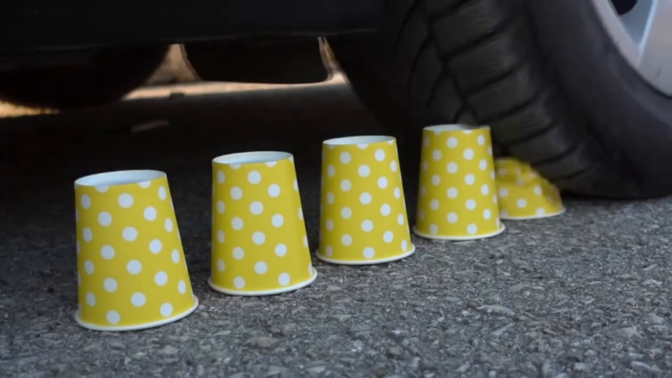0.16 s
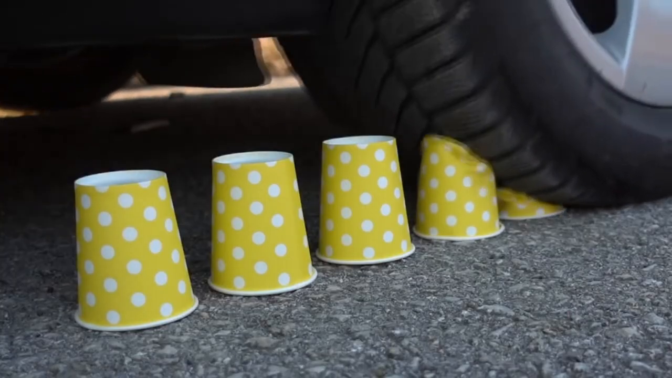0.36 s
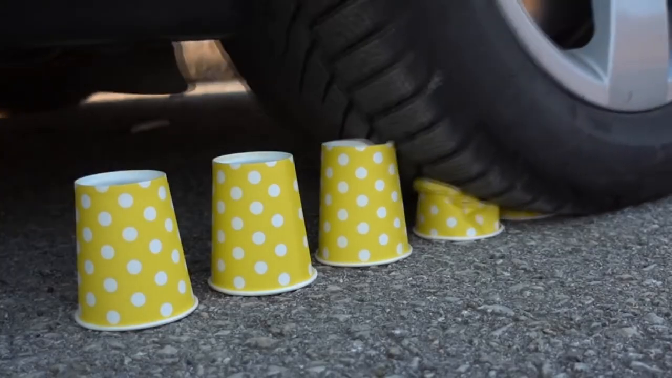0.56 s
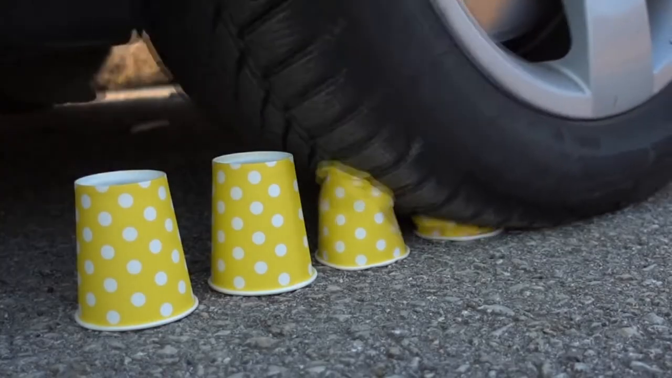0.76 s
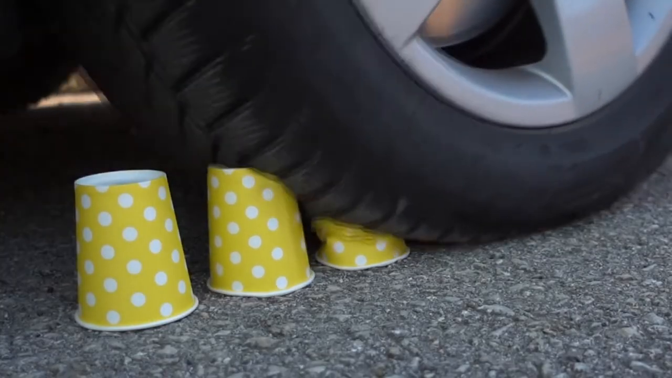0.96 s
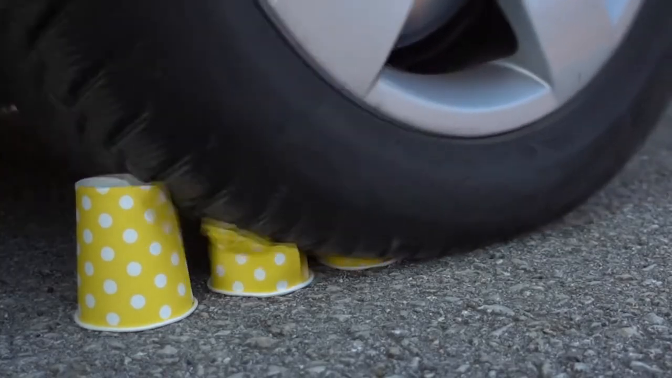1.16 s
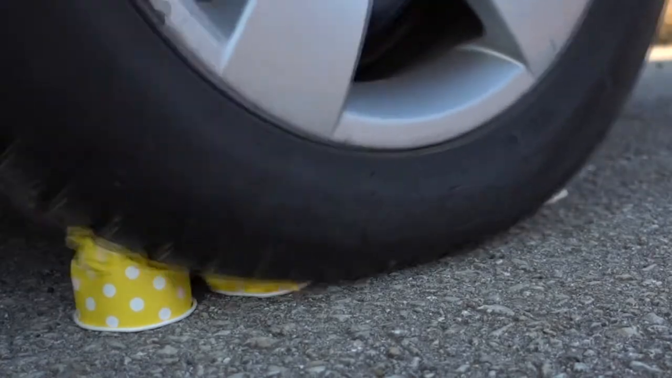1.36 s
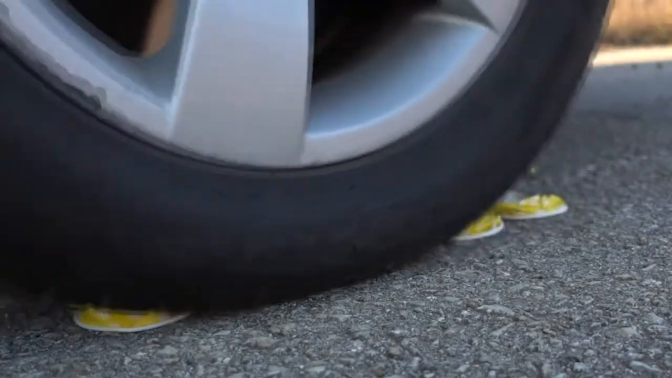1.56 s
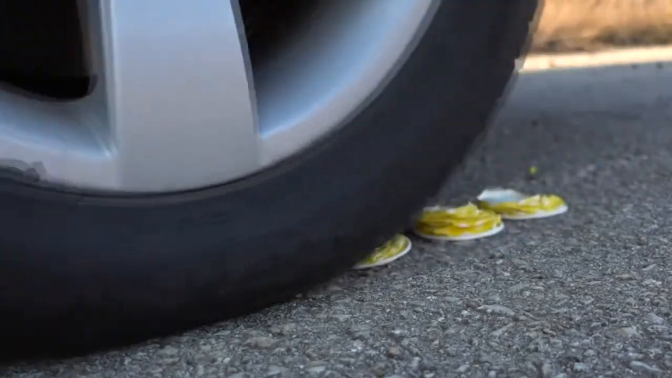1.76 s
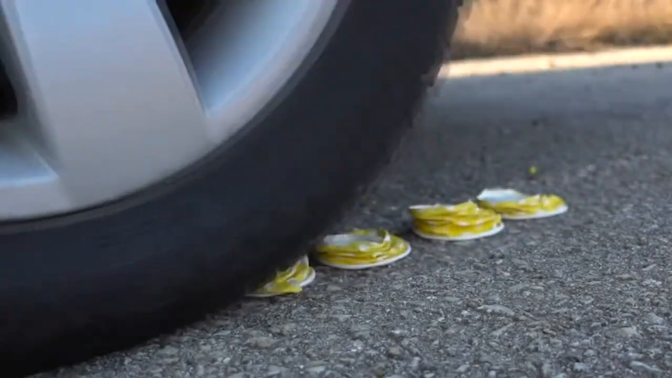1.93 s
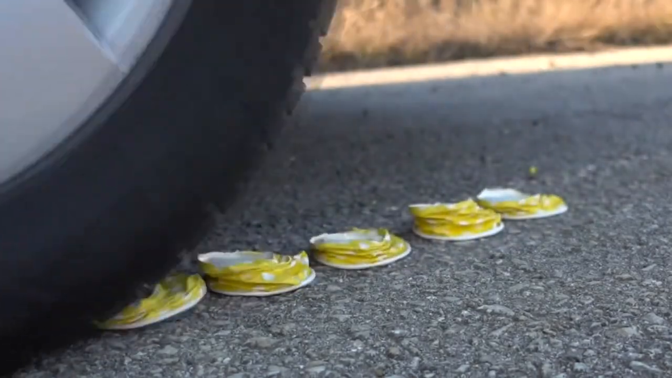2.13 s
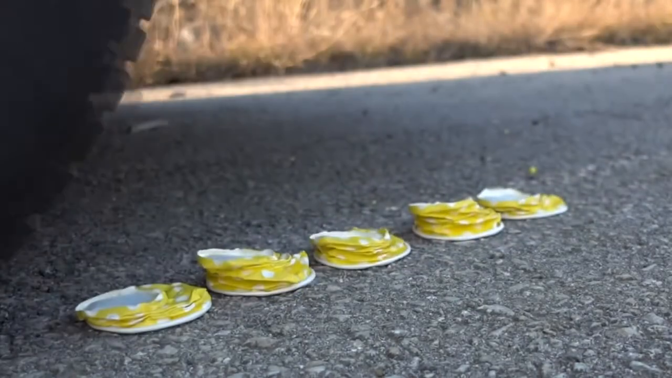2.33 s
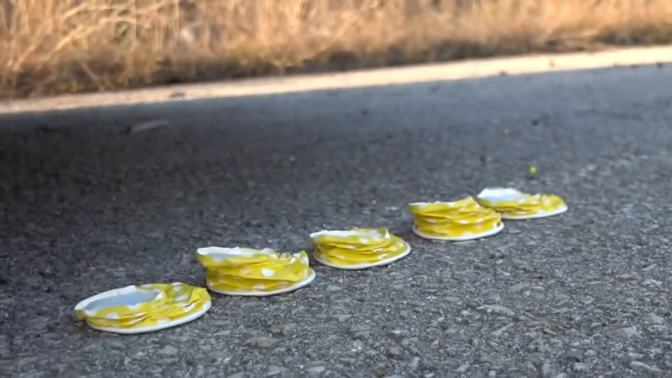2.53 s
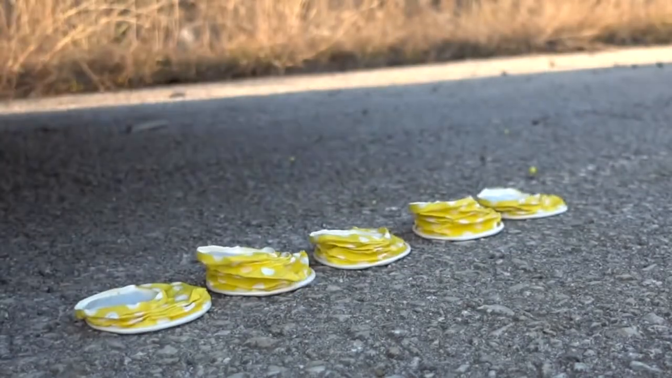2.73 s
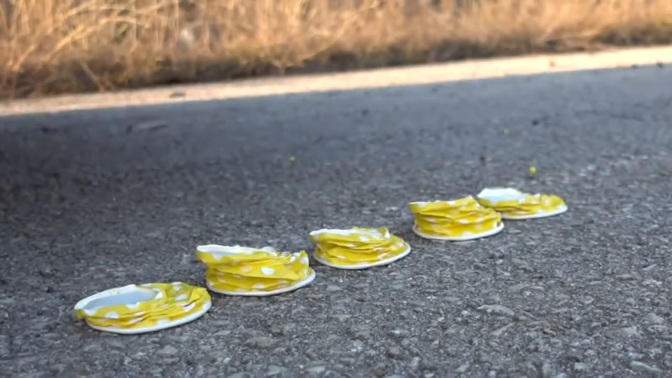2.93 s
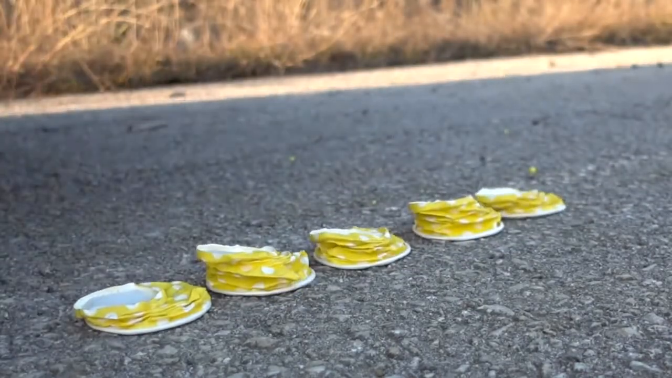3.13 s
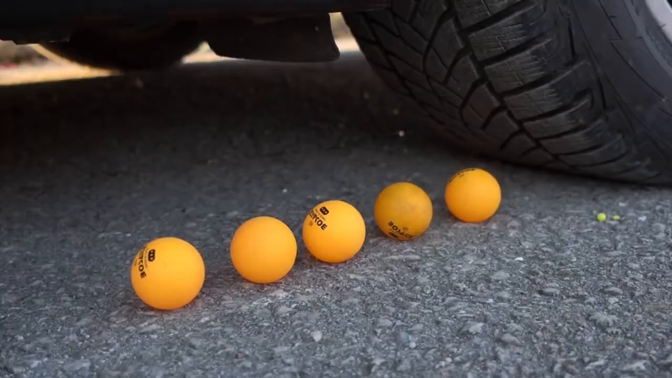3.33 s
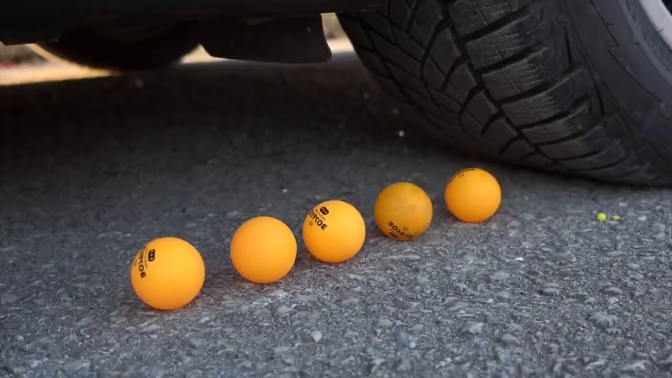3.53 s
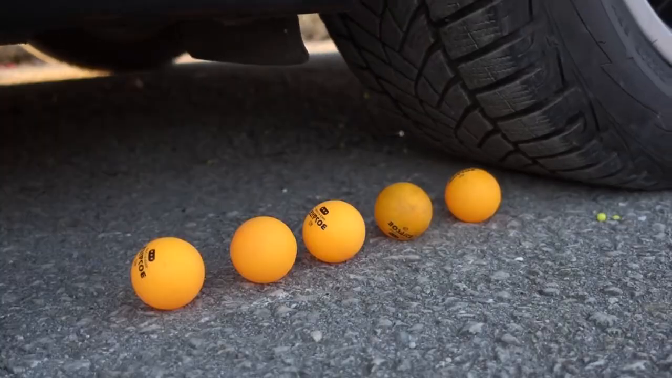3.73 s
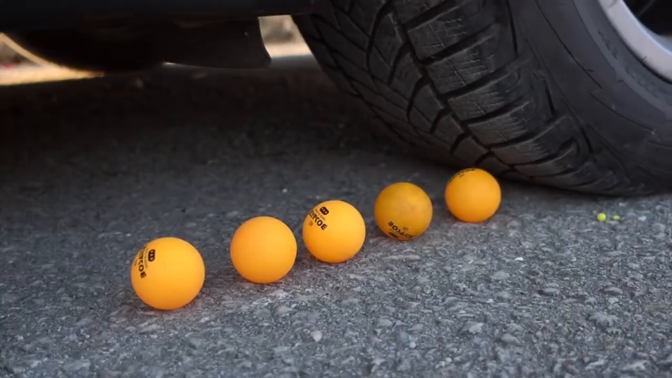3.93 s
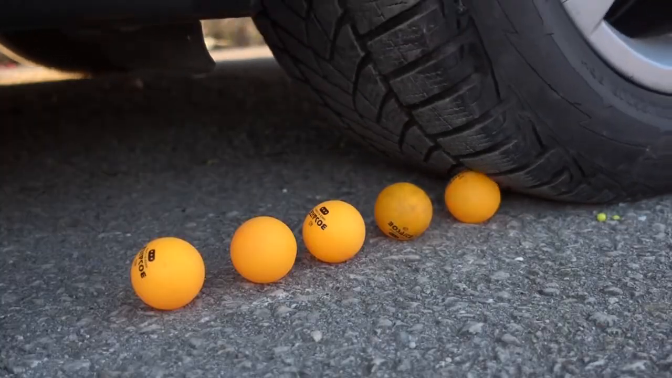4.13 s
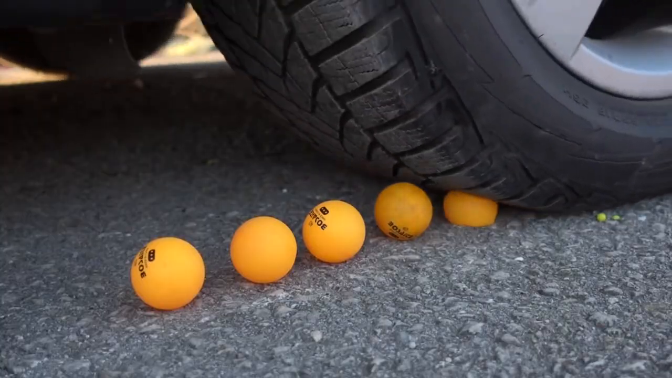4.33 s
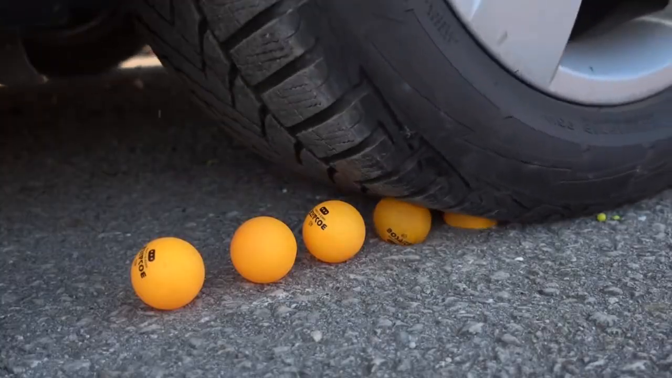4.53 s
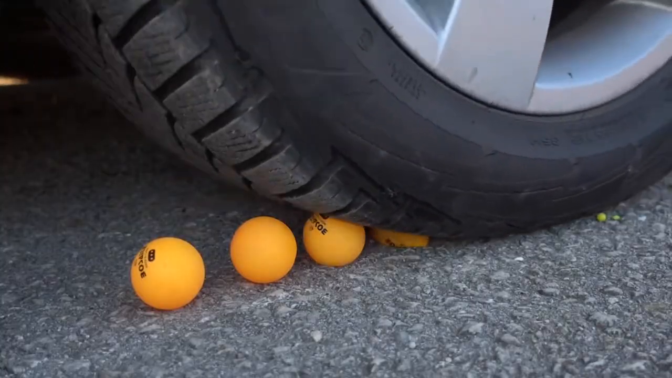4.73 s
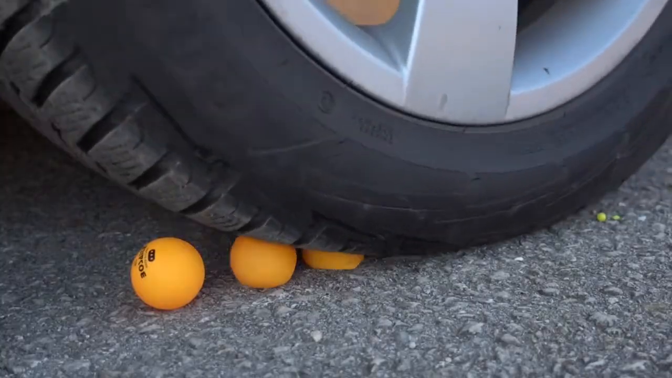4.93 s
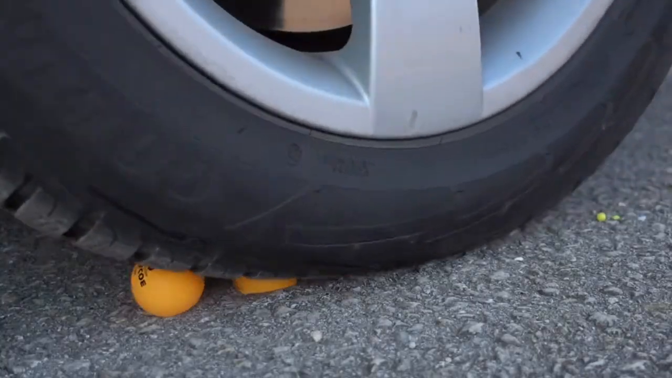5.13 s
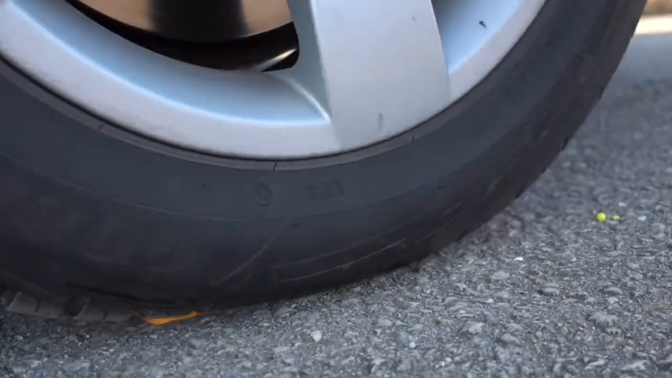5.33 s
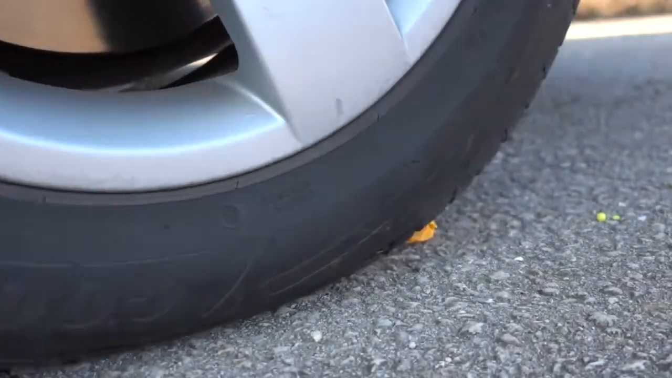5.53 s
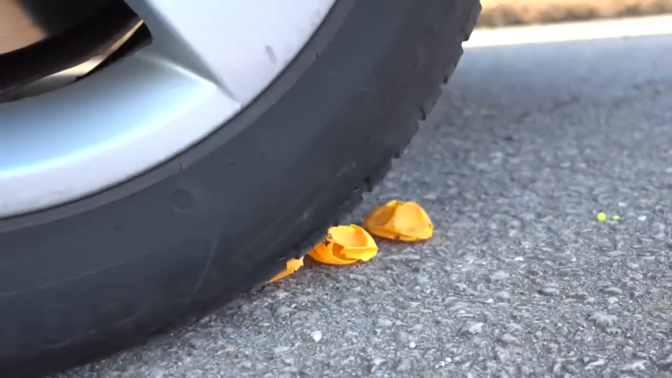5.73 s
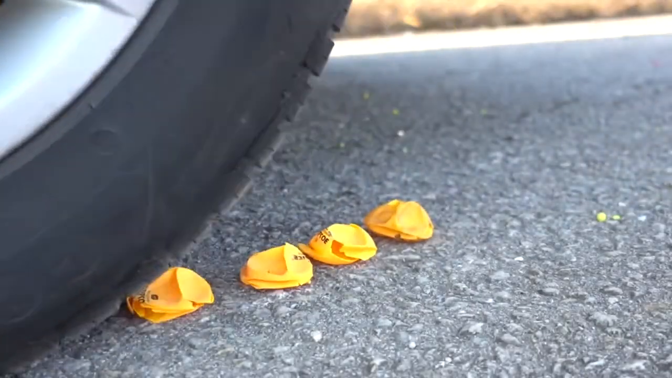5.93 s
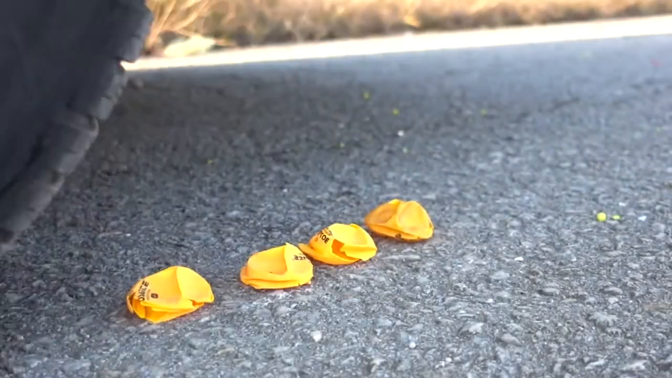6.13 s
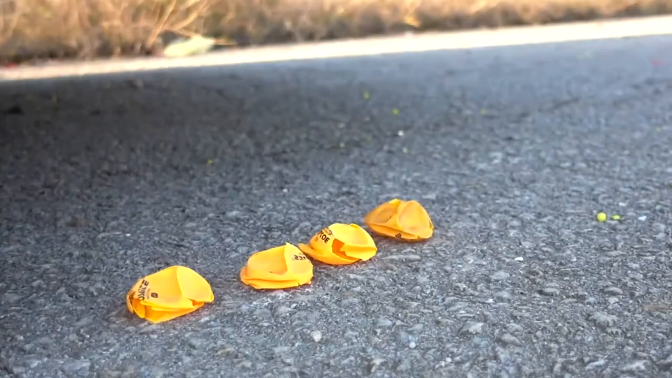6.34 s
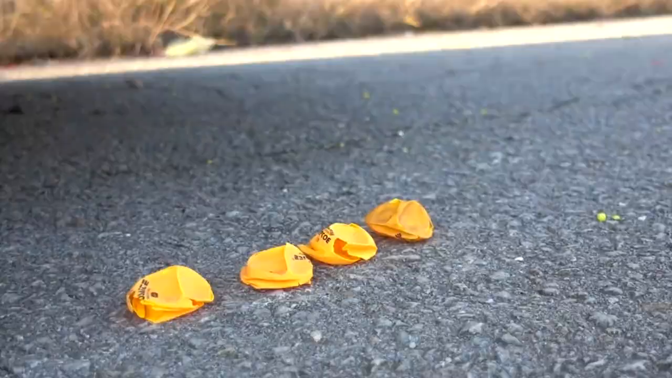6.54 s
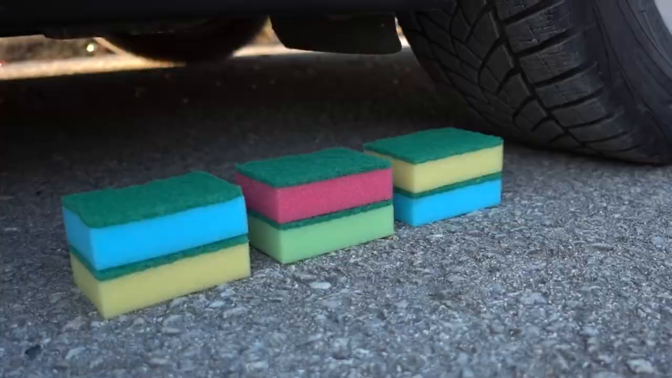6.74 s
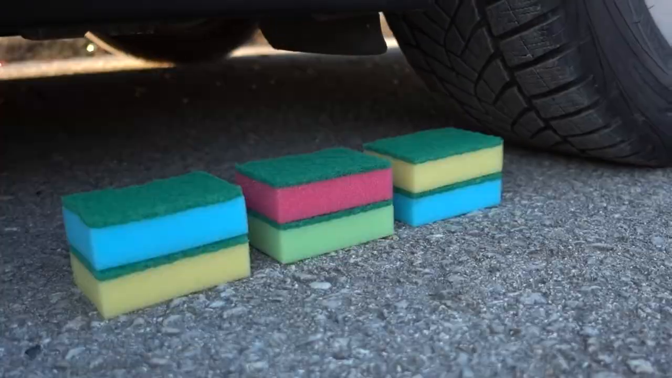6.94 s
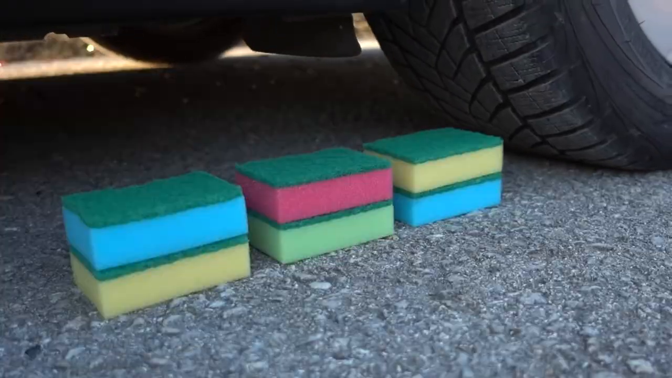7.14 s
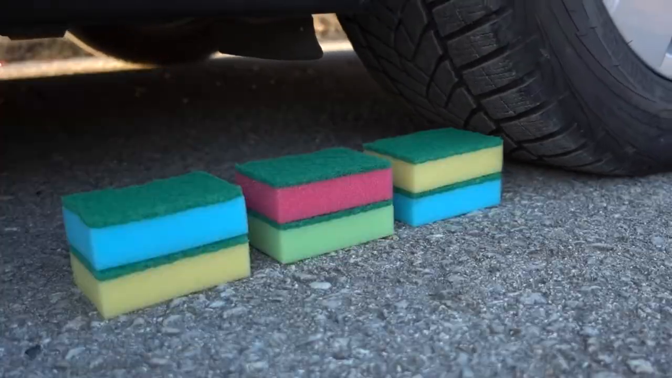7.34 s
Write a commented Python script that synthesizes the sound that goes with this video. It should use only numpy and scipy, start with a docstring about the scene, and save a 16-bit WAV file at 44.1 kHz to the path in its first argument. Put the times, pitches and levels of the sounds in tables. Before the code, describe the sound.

A car tyre creeps over asphalt, crushing paper cups with loud crackling and crumpling, then cracking a row of hollow plastic balls.

```python
"""A car tyre creeps over coarse asphalt close by, with a hiss and a low rumble that come and go. First it
crushes a row of paper cups: creases snap, walls pop and the car's underside echoes briefly. At 1.5 s it drops
off the cups and the air inside it hums; flat cups crinkle back and grit clicks. Around 3 s come scuffs, two
hollow scrapes and a soft low puff of wind. From 4.3 s a row of hollow plastic balls cracks; the tyre drops and
hums again, the shells spring back, and a few low wind puffs and clicks end the scene."""
import sys
import numpy as np
from scipy import signal
from scipy.fft import rfft, irfft, next_fast_len
from scipy.io import wavfile
from scipy.ndimage import map_coordinates

SR = 44100
rng = np.random.default_rng(int(sys.argv[2]) if len(sys.argv) > 2 else 0)


def wav_record(signal):
    """Record a signal, one row per channel, as 16-bit PCM in the file named by sys.argv[1]."""
    frames = np.transpose(np.atleast_2d(signal))
    bounded = np.clip(frames, -1, 1)
    # unit amplitude maps onto the largest positive 16-bit level
    quanta = np.round(bounded * 32767).astype(np.int16)
    wavfile.write(sys.argv[1], SR, quanta)


N = 330309

# the car creeping along: (time [s], rumble level [dB], rolling hiss level [dB])
ROAD_LEVELS = [(0, -41, -38.5), (1.4, -37, -31), (1.75, -54, -48), (3.2, -51.5, -43), (3.4, -40.5, -49),
               (3.52, -35, -59.5), (3.75, -61, -69), (4.2, -60.5, -63.5), (4.6, -42, -52.5),
               (5.4, -40, -58), (5.9, -57.5, -56), (6.4, -42.5, -52.5), (6.79, -41.5, -48),
               (6.81, -58.5, -67.5)]
# tone of the low rumble, the distant air and the rolling hiss: (frequency [Hz], level [dB])
RUMBLE_TONE = [(20, -24.5), (50, -0.5), (110, 6), (250, 1), (700, -48.5)]
DISTANT_TONE = [(700, -8.5), (1200, -39.5), (2130, -17.5), (3200, -30.5)]
ROLLING_TONE = [(200, 3), (600, 1.5), (1640, 2.5), (3000, -5.5), (5500, -16.5), (11000, -15)]
# where the wheel arch, loaded tyre and a dragged thing ring: (pitch [Hz], width [Hz], level [dB])
ARCH_RINGS = [(599, 41, 8.5), (3910, 360, 0.5)]
TYRE_RINGS = [(258, 35, 0)]
DRAGGED_RINGS = [(446, 70, 0), (1900, 90, -5)]
# cups and balls going under the tread, the last ball in two steps:
# (start [s], length [s], fine crackle level [dB], hollow crumple level [dB])
CUP_SQUEEZES = [(0, 0.029, -14, -9), (.25, 0.29, -16.5, -10.5), (.61, 0.27, -14, -10),
                (.92, 0.27, -11.5, -13.5), (1.21, 0.35, -15, -10)]
BALL_SQUEEZES = [(4.345, 0.11, -34, -26.5), (4.54, 0.08, -25, -24.5), (4.686, 0.062, -22.5, -21.5),
                 (4.99, 0.22, -26.5, -30), (5.27, 0.14, -18.5, -25), (5.468, 0.041, -20, -20.5)]
# paper creases snapping: (time [s], level [dB])
CREASES = [(0.095, -11.5), (0.2525, -9.5), (0.2801, -12), (0.3016, -6), (0.3248, -8.5), (0.328, -12.5),
           (0.344, -1), (0.3733, -9), (0.3965, -6), (0.407, -6), (0.416, -12), (0.441, -10.5), (0.4544, -4),
           (0.4675, -11.5), (0.525, -11), (0.537, -5.5), (0.571, -3.5), (0.611, -10), (0.6345, -14.5),
           (0.665, -5), (0.6806, -12), (0.7026, -8.5), (0.7193, -2), (0.756, -8), (0.778, -7),
           (0.8465, -11.5), (0.8591, -6.5), (0.973, -6), (1.028, -12.5), (1.0687, -8.5), (1.1416, -4.5),
           (1.172, -5.5), (1.255, -4), (1.2915, -13), (1.3287, -6), (1.354, -8.5), (1.383, -5.5),
           (1.4154, -7), (1.4878, -20.5), (1.523, -15.5), (1.564, -10.5)]
# echo under the car: (frequency [Hz], time to fade by 60 dB [s])
ECHO_TIMES = [(300, 0.06), (10000, 0.12)]
# walls of cups and balls buckling inwards: (time [s], level [dB], pitch [Hz])
WALL_POPS = [(0.1079, -10, 860), (0.1476, -7, 1420), (0.2282, -7.5, 634), (0.4946, -12.5, 638),
             (0.613, -12, 738), (0.6688, -10.5, 499), (0.875, -8, 808), (0.924, -10.5, 626),
             (0.9806, -8.5, 629), (1.072, -7.5, 1400), (1.187, -11.5, 1390), (1.2114, -7.5, 660),
             (1.2265, -16, 799), (1.27, -12, 760), (1.3111, -12, 1270), (1.375, -10, 685),
             (1.4424, -12.5, 830), (4.6899, -14, 986), (4.7298, -12.5, 794), (5.294, -17.5, 726),
             (5.3737, -13.5, 820), (5.4723, -11.5, 726)]
# the tyre dropping off something it has flattened: (time [s], level [dB])
TYRE_DROPS = [(1.5, -39), (5.495, -37)]
# flattened rows springing back: (start [s], length [s], level [dB], pitch [Hz])
CRINKLES = [(1.782, .55, -47.5, 2340), (5.566, 0.47, -42.5, 4230)]
# grit clicking, small hollow scuffs and plastic cracking: (time [s], level [dB], pitch [Hz])
GRIT_CLICKS = [(1.7963, -15, 2410), (1.849, -20.5, 2980), (1.8855, -20.5, 1330), (1.9672, -22.5, 4040),
               (2.0204, -21, 3330), (2.1174, -20.5, 4900), (2.1519, -20, 3300), (2.173, -20.5, 4550),
               (2.186, -22, 2000), (2.2497, -30.5, 2140), (2.289, -23, 1500), (2.3159, -9.5, 1680),
               (3.0614, -9.5, 1290), (3.167, -14, 1600), (6.5013, -8.5, 3050), (6.53, -16.5, 800),
               (7.084, -34.5, 1320), (7.2866, -33.5, 3200)]
GROUND_SCUFFS = [(2.707, -32, 296), (3.69, -36.5, 500)]
SHELL_CRACKS = [(4.2573, -17.5, 10100), (4.292, -8, 4990), (4.349, -6, 8550), (4.368, -7.5, 1957),
                (4.414, -9, 1830), (4.4524, -11.5, 8100), (4.5385, -7, 5450), (4.6058, -5.5, 8600),
                (4.6622, -5, 8090), (4.679, -7.5, 5240), (4.7227, -4, 6870), (4.7457, -13, 6000),
                (4.771, -8, 5030), (4.784, -10.5, 6590), (4.799, 0, 8920), (4.8257, -9, 7540),
                (4.8723, -8.5, 7800), (4.8896, -5.5, 1846), (4.9369, -5.5, 4790), (4.969, -2, 4480),
                (5.0002, -2.5, 3400), (5.0186, -3.5, 2200), (5.0314, -7.5, 7000), (5.0418, -3.5, 6360),
                (5.0521, -2.5, 2994), (5.1107, -4.5, 4970), (5.1297, -2.5, 6000), (5.1705, -9.5, 6210),
                (5.2017, -6, 6330), (5.266, -6.5, 4400), (5.29, -4, 5160), (5.325, -13, 2490),
                (5.3696, -15, 4170), (5.3948, -6.5, 3580), (5.4123, -9, 5250), (5.451, -3, 8230),
                (5.4703, -9.5, 4630), (5.5416, -8, 3840), (5.6128, -1.5, 6830), (5.6226, -5, 4370),
                (5.655, -5.5, 4540), (5.684, -11, 4430), (5.728, -7, 5140), (5.75, -4.5, 4400),
                (5.7766, -3.5, 3400), (5.796, -15, 3820), (5.8416, -5, 5700), (5.85, -10, 5870),
                (5.892, -4.5, 6700), (5.9726, -9.5, 3254), (6.0664, -11, 2960)]
# something hollow dragged over the asphalt: (start [s], length [s], level [dB])
DRAGS = [(3.275, .04, -37), (3.335, .04, -32)]
# soft low puffs of wind: (middle time [s], level [dB], pitch [Hz])
WIND_PUFFS = [(3.446, -23, 136), (4.577, -22.5, 199), (5.13, -29, 60.7), (5.287, -23, 166), (6.057, -28, 82.5),
              (6.108, -31, 143), (6.429, -22, 173), (6.633, -23, 89), (6.705, -27.5, 70), (6.785, -32.5, 84.6)]
# where the wheel is heard: (time [s], left level minus right level [dB])
WHEEL_SIDE = [(0, -2.5), (2.6, 4), (4.3, -2.5), (6.6, 6)]
# how alike left and right are: (frequency [Hz], likeness [0 to 1])
LIKENESS = [(1200, .94), (2800, .78), (9000, .33)]
# the microphone's treble falling away: (frequency [Hz], level [dB])
TREBLE_CUT = [(10900, 1), (11300, -13.5), (12300, -34.5), (16000, -63.5)]


def amp(db):
    """Turn decibels into a number to multiply a sound by."""
    return 10 ** (np.asarray(db) / 20)


def unit(x):
    """Scale a sound to an average strength (rms) of 1."""
    return x / np.sqrt(np.mean(x ** 2) + 1e-20)


def along(points, hz):
    """Read between a table's (frequency, value) rows, with octaves evenly spaced."""
    f, values = np.transpose(points)
    return np.interp(np.log(hz + 1), np.log(f + 1), values)


def curves(rows):
    """Join timed rows with straight lines, one curve for each column after the time."""
    times, *columns = np.transpose(rows)
    return [np.interp(np.arange(N) / SR, times, column) for column in columns]


def wobble(rate):
    """A smooth curve through `rate` random values a second."""
    return map_coordinates(rng.standard_normal(int(N * rate / SR) + 4), [np.arange(N) * rate / SR])


def filtered(x, response):
    """Multiply each frequency in a sound by response(frequency)."""
    size = next_fast_len(N + SR)
    return irfft(rfft(x, size) * response(np.fft.rfftfreq(size, 1 / SR)), size)[..., :N]


def resonant(x, rings, rest_db):
    """Make a sound ring at some pitches, let the rest through at rest_db, and scale to strength 1."""
    def response(f):
        peaks = sum(amp(db) * 1j * f * width / (hz * hz - f * f + 1j * f * width)
                    for hz, width, db in rings)
        return amp(rest_db) + peaks
    return unit(filtered(x, response))


def stereo(pair, response=np.ones_like):
    """Mix two unrelated sounds into left and right, alike in the bass and less so in the treble."""
    def blend(hz):
        angle = np.arccos(np.clip(along(LIKENESS, hz), -1, 1)) / 2
        return response(hz) * [np.cos(angle), np.sin(angle)]
    mid, side = filtered(pair, blend)
    return np.array([mid + side, mid - side])


def rush(tone):
    """Steady stereo noise shaped by a tone table."""
    return unit(stereo(rng.standard_normal((2, N)), lambda hz: amp(along(tone, hz))))


def place(times, waves):
    """Add each short wave into one track at its start time."""
    at = np.round(times * SR).astype(int)[:, None] + np.arange(waves.shape[1])
    return np.bincount(at.ravel(), waves.ravel(), N)[:N]


def pings(times, db, hz, spread, cycles, notes, size):
    """Each ping is a few notes scattered round a pitch, fading by 60 dB in `cycles` vibrations."""
    draw = rng.standard_normal((len(times), notes, 2))
    pitches = np.clip(hz[:, None] * np.exp(spread * draw[..., 0]), 40, SR / 2.5)[..., None]
    channels = []
    for side in (1, -1):
        delay_s = 2e-5 * (2 - side * draw[..., 1:])  # left and right arrive slightly apart
        turns = pitches * np.clip(np.arange(size) / SR - delay_s, 0, None)
        waves = (np.sin(2 * np.pi * turns) * amp(-60 * turns / cycles) * (1 - np.exp(-3 * turns))).sum(1)
        waves *= (amp(db) / np.abs(waves).max(1))[:, None]
        channels.append(place(times, waves))
    return np.array(channels)


def crackle(span, level_db, hz, spread, cycles, uneven_db, count, size):
    """Tiny pings of very unequal strength, at random times within the span."""
    draw, length = rng.random((count, 2)), span[1] - span[0]
    times = span[0] + draw[:, 0] * length
    ping_db = -uneven_db * np.log(draw[:, 1] + .02)
    ticks = pings(times, ping_db, np.full(count, hz), spread, cycles, notes=2, size=size)
    return amp(level_db) * unit(ticks) * np.sqrt(length * SR / N)


def snaps(times, db, hz, octaves, floor_db, rise_s, fade_s, size=2048):
    """Bursts of noise round a pitch, fading by 60 dB in about fade_s; a faint rattle trails each."""
    t, f = np.arange(size) / SR, np.fft.rfftfreq(size, 1 / SR) + 1
    hump = np.exp(-.5 * (np.log2(f / hz[:, None]) / octaves) ** 2)
    white = rfft(rng.standard_normal((len(times), 2, size)))
    burst = irfft(white * (hump + amp(floor_db) * (f > 300))[:, None], size)
    fades = fade_s * np.exp(.35 * rng.standard_normal((len(times), 1, 1)))
    burst *= amp(-60 * np.clip(t - rise_s, 0, None) / fades)
    rattle = irfft(white * hump[:, None] ** 2, size) * amp(-27 - 60 * t / 0.27)
    waves = np.clip(t / rise_s, 0, 1) ** 2 * (burst + rattle)
    waves *= (amp(db) / np.abs(waves[:, 0]).max(1))[:, None, None]
    return stereo(np.array([place(times - rise_s, waves[:, k]) for k in (0, 1)]))


def squeeze(rows, fades_db_per_s, rise_db_per_s=2897.5):
    """Levels in dB that rise fast, hold while a thing is pressed, then fade; the loudest thing counts."""
    starts, lengths, *levels = np.transpose(rows)[..., None]
    t = np.arange(N) / SR - starts
    rise_db = rise_db_per_s * np.clip(t, None, 0)
    since_end = np.clip(t - lengths, 0, None)
    return [(db + rise_db - fade * since_end).max(0) for db, fade in zip(levels, fades_db_per_s)]


def settling(rows, fade_s, rest_db):
    """A level in dB that jumps at every break and dies away as the torn material settles."""
    times, db = np.transpose(rows)[:2]
    kicks = np.bincount(np.round(times * SR).astype(int), amp(db) ** 2, N)
    power = signal.lfilter([1], [1, -amp(-120 / (fade_s * SR))], kicks)
    return 10 * np.log10(power + amp(rest_db) ** 2)


def rumble_and_air():
    """The creeping car's lumpy low rumble, over a steady hush of distant air."""
    rumble = unit(amp(3.4 * wobble(24)) * rush(RUMBLE_TONE))
    return amp(curves(ROAD_LEVELS)[0]) * rumble + amp(-60) * rush(DISTANT_TONE)


def rolling():
    """Rubber rolls on rough asphalt with a gritty, fluttering hiss that rings in the wheel arch."""
    flutter = amp(2.6 * wobble(180))
    hiss = resonant(rush(ROLLING_TONE), ARCH_RINGS, rest_db=3.5)
    return amp(curves(ROAD_LEVELS)[1]) * unit(flutter * hiss)


def cups():
    """Creases snap, each at its own pitch; the card then tears and crumples dully."""
    fine_db, hollow_db = squeeze(CUP_SQUEEZES, fades_db_per_s=(170, 123))
    times, db = np.transpose(CREASES)
    pitches = 2500 * np.exp(.35 * rng.standard_normal(len(times)))
    creases = snaps(times, db, pitches, octaves=0.73, floor_db=-9.5, rise_s=0.00087, fade_s=0.0082)
    fine_db += settling(CREASES, fade_s=0.08, rest_db=-17.5)
    hollow_db += settling(WALL_POPS, fade_s=0.16, rest_db=-20)
    span_s = (0, 1.75)
    fine = crackle(span_s, fine_db, hz=3305, spread=.7, cycles=6.7, uneven_db=8, count=2300, size=160)
    hollow = crackle(span_s, hollow_db, hz=1000, spread=.42, cycles=8, uneven_db=4.5, count=650, size=600)
    return creases + fine + hollow


def underside(crush):
    """Sound bounces briefly between the car's floor and the road; the treble lasts longest."""
    hz, t, noise = signal.stft(rng.standard_normal((2, SR // 4)), SR, nperseg=128)
    fade = amp(-60 * t / along(ECHO_TIMES, hz)[:, None])
    tail = signal.istft(noise * fade, SR, nperseg=128)[1]
    echo = signal.fftconvolve(crush.mean(0)[None], tail / np.linalg.norm(tail[0]), axes=1)
    return stereo(echo[:, :N])


def tyre(crush, hum_hz=226, fade_s=2.1):
    """The loaded tyre rings dully with all it crushes; after each drop the air inside it hums on."""
    body = amp(-41) * resonant(crush.mean(0), TYRE_RINGS, rest_db=-72)
    times, db = np.transpose(TYRE_DROPS)
    drops = np.bincount(np.round(times * SR).astype(int), amp(db), N)
    t = np.arange(2 * SR) / SR
    hum = amp(-60 * t / fade_s) * np.sin(2 * np.pi * hum_hz * t)
    return body + signal.fftconvolve(drops, hum)[:N]


def wall_pops():
    """A wall flips inwards and the air inside rings for a moment."""
    times, db, hz = np.transpose(WALL_POPS)
    return pings(times - .002, db, hz, spread=0.1, cycles=14, notes=3, size=1500)


def spring_back():
    """Crushed walls unfold in a thin, spiky crinkle as the tread peels off them."""
    return sum(crackle((start, start + length), db, hz,
                       spread=.4, cycles=14, uneven_db=6, count=400, size=200)
               for start, length, db, hz in CRINKLES)


def grit():
    """Single stones and shards click as they slip free under the tread."""
    return snaps(*np.transpose(GRIT_CLICKS), octaves=.6, floor_db=-21, rise_s=.0005, fade_s=.01)


def scuffs():
    """Brief, dull scuffs on the ground."""
    times, db, hz = np.transpose(GROUND_SCUFFS)
    return snaps(times, db, hz, octaves=0.57, floor_db=-48, rise_s=0.0058, fade_s=0.12, size=4096)


def scrapes():
    """Rough rubbing on the asphalt makes a hollow, dragged thing ring."""
    rubbing = amp(3 * wobble(150)) * rush([(200, -30), (400, 0), (6000, -27)])
    level_db = squeeze(DRAGS, fades_db_per_s=(830,))[0]
    return amp(level_db) * resonant(rubbing, DRAGGED_RINGS, rest_db=-16)


def wind_puffs():
    """Soft low puffs of wind, each a deep note that swells and sinks within a few vibrations."""
    t = np.arange(N) / SR
    return sum(amp(db - ((t - middle) * hz / 0.24) ** 2) * np.cos(2 * np.pi * hz * (t - middle))
               for middle, db, hz in WIND_PUFFS)


def balls():
    """Thin, hard plastic shells crack brightly and keep splintering after each crack."""
    cracks = snaps(*np.transpose(SHELL_CRACKS), octaves=.79, floor_db=-11.5, rise_s=.0004, fade_s=.0065)
    fine_db, hollow_db = squeeze(BALL_SQUEEZES, fades_db_per_s=(150, 230))
    after_db = settling(SHELL_CRACKS, fade_s=0.43, rest_db=-17.5)
    span_s = (4.25, 5.8)
    fine = crackle(span_s, fine_db + after_db, hz=7020,
                   spread=0.7, cycles=23, uneven_db=5.5, count=3000, size=160)
    hollow = crackle(span_s, hollow_db + after_db, hz=900,
                     spread=0.33, cycles=11, uneven_db=4.5, count=550, size=550)
    return cracks + fine + hollow


def scene():
    """Add up the sounds at the wheel, shift them between left and right, then add wind puffs and rumble."""
    crush = cups() + balls() + wall_pops() + grit() + spring_back()
    crush = filtered(crush, lambda hz: (1j * hz / (150 + 1j * hz)) ** 2)  # the crushing sounds are kept out of the deep bass
    wheel = crush + amp(-5) * underside(crush) + tyre(crush) + rolling() + scuffs() + scrapes()
    balance = amp(np.outer([.5, -.5], curves(WHEEL_SIDE)[0]))
    return wheel * balance + wind_puffs() + rumble_and_air()


def record(dry, top_hz=16400):
    """The microphone rounds off loud peaks, dulls the treble above 11 kHz and stops at top_hz."""
    return filtered(np.tanh(dry), lambda hz: amp(along(TREBLE_CUT, hz)) * (hz < top_hz))


dry = scene()
out = record(dry)
wav_record(out)
```